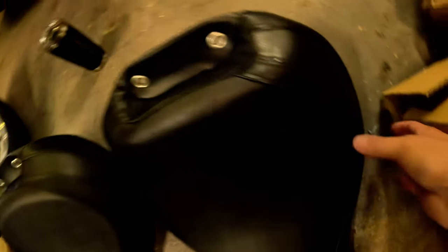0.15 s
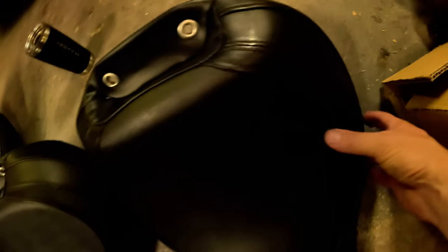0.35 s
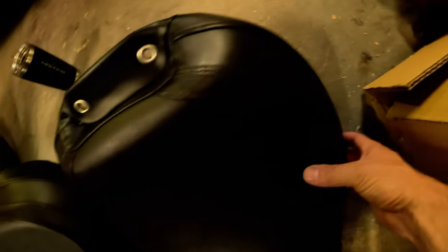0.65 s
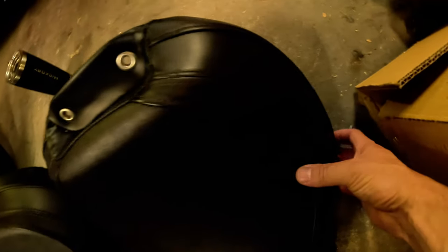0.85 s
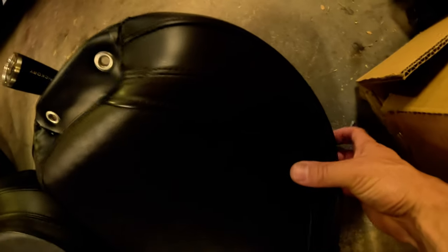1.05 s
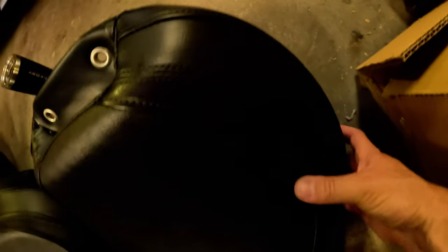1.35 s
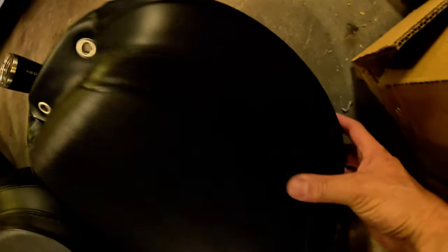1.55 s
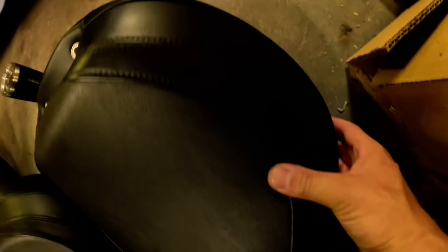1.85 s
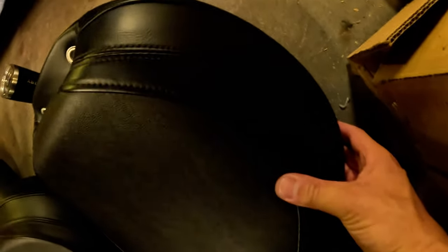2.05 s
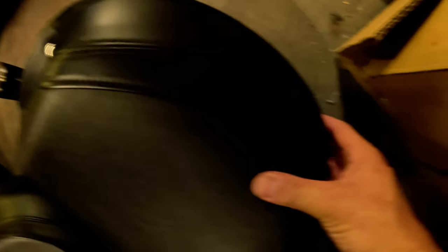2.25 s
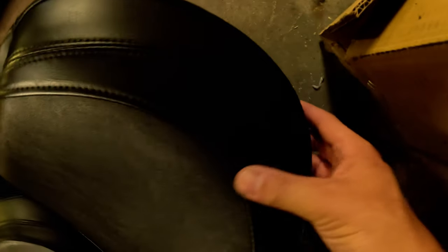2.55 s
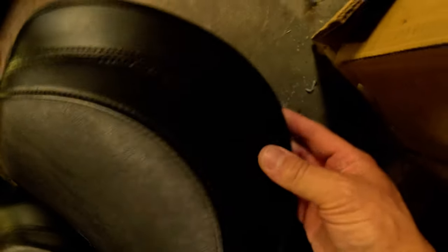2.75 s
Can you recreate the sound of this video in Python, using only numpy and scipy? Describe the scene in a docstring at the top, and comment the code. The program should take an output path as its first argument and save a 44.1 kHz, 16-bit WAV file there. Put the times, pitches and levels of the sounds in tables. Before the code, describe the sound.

A padded vinyl seat is handled on a concrete garage floor: faint finger pats and rubs, a cluster of dull knocks, then short gritty drags with a low judder, close microphone, quiet small room.

```python
"""Padded seat on a garage floor

A hand grips a padded vinyl motorcycle seat and shifts it over a concrete garage floor.
The seat gives dull knocks, drags in gritty stick-slip scrapes, judders and squeaks once.
Fingers pat and rub the cover, skin brushes it and the vinyl snaps, over low rumble and room tone.
Knocks are decaying tones and noise, friction is trains of small slips, the rest is filtered noise."""
import sys
import numpy as np
from scipy import signal
from scipy.fft import rfft, irfft
from scipy.io import wavfile
from scipy.ndimage import uniform_filter1d

SR = 44100
rng = np.random.default_rng(int(sys.argv[2]) if len(sys.argv) > 2 else 0)


def log_audio(samples):
    """Write samples as a 16-bit WAV file to the path given in sys.argv[1]."""
    # one column per channel
    frames = np.atleast_2d(samples).T
    # limit to full scale, then quantise
    limited = np.clip(frames, -1, 1)
    pcm = np.round(limited * 32767).astype(np.int16)
    wavfile.write(sys.argv[1], SR, pcm)


N = 127890  # length in samples
T = np.arange(N) / SR  # time in seconds
CONTACT_RISE_S = 0.001  # soft start of the knocks' contact sound and of the pats


def undb(db):
    """Turn decibels into a gain."""
    return 10 ** (np.asarray(db) / 20)


def unit(x):
    """Scale a sound to an average (rms) strength of 1."""
    return x / np.sqrt(np.mean(x ** 2))


def colour(x, points):
    """Filter x through (pitch_hz, level_db) points without pre-echo; the result has rms 1."""
    hz, db = np.array(points, float).T
    size = 4096
    freqs = np.maximum(np.fft.rfftfreq(size, 1 / SR), 1)
    log_gain = np.log(undb(np.interp(np.log(freqs), np.log(hz), db)))
    # Folding the cepstrum gives the filter that responds as early as it can (minimum phase).
    cepstrum = irfft(log_gain)
    cepstrum[1:size // 2] *= 2
    cepstrum[size // 2 + 1:] = 0
    response = irfft(np.exp(rfft(cepstrum)))
    return unit(signal.fftconvolve(x, response)[:N])


def curve(rows, column=1):
    """Draw a gain over time from a dB column, practically silent before and after the rows."""
    rows = np.array(rows, float)
    return undb(np.interp(T, rows[:, 0], rows[:, column], left=-200, right=-200))


def swell(centre, spread):
    """A smooth bell-shaped rise and fall around a moment."""
    return np.exp(-((T - centre) / spread) ** 2 / 2)


def add(out, start, x):
    """Mix x into out from a start time."""
    i = int(start * SR)
    out[i:i + len(x)] += x[:N - i]


def slips(hz, jitter, spread_db):
    """Stick-slip friction: a train of sudden releases with uneven gaps and sizes."""
    chance = rng.standard_normal((4000, 2))
    gaps_s = np.exp(jitter * chance[:, 0]) / hz
    at = (np.cumsum(gaps_s) * SR).astype(int)
    inside = at < N
    sizes = undb(spread_db * chance[inside, 1])
    return np.bincount(at[inside], sizes, N)


def grains(spread_db):
    """Fine rough texture: dense micro-clicks of very unequal size."""
    sizes = undb(spread_db * np.minimum(rng.exponential(size=N), 5))
    return unit(rng.standard_normal(N) * sizes)


def steady(x, seconds=0.045):
    """Even out slow changes of strength, so that a level curve can set them."""
    power = np.abs(uniform_filter1d(x ** 2, int(seconds * SR)))
    return x / np.sqrt(power + 0.0011)


CONTACT_RING_S, CONTACT_RING_DB = 0.0026, -3.5  # decay time, level against the plain sound


def patch(x):
    """A patch of contact rings for a few milliseconds with its own chance resonances."""
    length = SR // 25
    ring = rng.standard_normal(length) * np.exp(-T[:length] / CONTACT_RING_S)
    ringing = signal.fftconvolve(x, ring / np.linalg.norm(ring))[:N]
    return unit(x + undb(CONTACT_RING_DB) * ringing)


# Knocks of the seat: start_s, pitch_hz, thump_db, shell_db, tick_db
# (shell, tick and crackle are halved when mixed)
SEAT_KNOCKS = [(0.832, 156, -29.5, -65, -56), (0.8575, 237, -29.5, -35, -45.5),
               (0.8625, 172, -21, -60, -50), (0.967, 217, -26, -37, -45.5),
               (0.9961, 190, -28.5, -34, -39.5), (1.181, 238, -31.5, -52, -42),
               (1.213, 188, -26.5, -41, -44), (1.249, 152, -28, -42, -53), (1.291, 143, -38, -54, -50.5),
               (1.499, 213, -39, -47, -46), (1.974, 345, -29, -32, -38.5), (1.993, 334, -29.5, -36, -41),
               (2.017, 327, -30.5, -42, -39), (2.03, 268, -32, -35, -46), (2.281, 144, -35.5, -66, -98),
               (2.474, 300, -28.5, -40, -39), (2.507, 286, -27.5, -38.5, -35)]
# Ringing tones of the seat shell: pitch_hz, level_db, t60_s (time to fall by 60 dB);
# each knock shifts pitch and level a little by chance
SHELL_TONES = [(312, -18.5, 0.05), (474.6, 8, 0.046), (545, -5.5, 0.034), (705, -6, 0.021),
               (892, -11, 0.081), (1048, -7.5, 0.047)]
# Tone colour of the contact tick: pitch_hz, level_db
TICK_TONE = [(500, 18), (1000, 11.5), (2300, 9), (4000, 1), (9000, -14), (15000, -25)]
THUMP_CYCLES, THUMP_RISE = 0.31, 2.7  # fade time in cycles, steepness of the rise
TICK_S = 0.006  # decay time
CRACKLE_DB, CRACKLE_S = -22.5, 0.0029  # level against the tick, decay time


def knocks():
    """Each knock is a damped padding thump, a short shell ring, a contact tick and a vinyl crackle."""
    out, t = np.zeros(N), T[:SR // 5]
    ticks = colour(rng.standard_normal(N), TICK_TONE)
    crackles = np.diff(grains(spread_db=2), prepend=0) / 2  # differences favour the treble
    for start, hz, thump_db, shell_db, tick_db in SEAT_KNOCKS:
        i = int(start * SR)
        age = t * hz / THUMP_CYCLES
        thump_shape = (age / THUMP_RISE) ** THUMP_RISE * np.exp(THUMP_RISE - age)
        thump = thump_shape * np.sin(2 * np.pi * hz * t)

        shell = np.zeros(len(t))
        for tone_hz, db, t60 in SHELL_TONES:
            level_chance, pitch_chance = rng.standard_normal(2)
            fade = undb(db + 2 * level_chance - 60 * t / t60)
            shell += fade * np.sin(2 * np.pi * tone_hz * (1 + 0.036 * pitch_chance) * t)

        # Each knock takes a different stretch of the noise.
        tick = np.roll(ticks, -i)[:len(t)] * np.exp(-t / TICK_S)
        crackle = undb(CRACKLE_DB) * np.roll(crackles, -i)[:len(t)] * np.exp(-t / CRACKLE_S)
        soft_start = 1 - np.exp(-t / CONTACT_RISE_S)
        contact = soft_start * (undb(shell_db) * shell + undb(tick_db) * tick) / 2
        add(out, start, undb(thump_db) * thump + contact + undb(tick_db) * crackle)
    return out


# Drags over the concrete, one list per drag: time_s, body_db, grit_db
# (BODY_DB and GRIT_DB are added to these)
FLOOR_DRAGS = [
    [(1.07, -60, -74), (1.10, -44.5, -58.5), (1.15, -39.5, -56.5), (1.2, -38.5, -51), (1.25, -41.5, -57),
     (1.285, -68, -77)],
    [(1.375, -60, -91), (1.418, -43, -64.5), (1.44, -52.5, -76), (1.465, -41.5, -66.5), (1.49, -64, -92)],
    [(1.585, -55, -69), (1.602, -47, -59), (1.62, -36.5, -49.5), (1.685, -39, -54.5), (1.702, -44, -62.5),
     (1.735, -46, -58.5), (1.765, -41, -52), (1.803, -41.5, -58), (1.83, -38, -53), (1.862, -33.5, -52.5),
     (1.885, -46, -62), (1.92, -88, -77)],
    [(2.572, -39, -58), (2.604, -50, -71), (2.614, -34.5, -57.5), (2.668, -40, -54), (2.688, -53, -67.5),
     (2.73, -61, -60.5)],
]
# Tone colour of the shaken seat body: pitch_hz, level_db
BODY_TONE = [(70, -37), (140, -1), (290, 4.5), (400, -9), (480, -3.5), (640, -11.5), (980, -10),
             (1170, -27.5), (1700, -35.5), (9000, -55.5)]
# Tone colour of the grit: pitch_hz, level_db
GRIT_TONE = [(700, -8.5), (1300, 4.5), (3300, -0.5), (5000, -6), (6800, -19), (9000, -19), (15000, -25)]
SLIP_HZ, SLIP_JITTER, SLIP_SPREAD_DB = 401.8, 0.6, 2  # typical rate, unevenness of gaps and sizes
BODY_DB, GRIT_DB = -1.5, -1
SLIP_S = 0.002  # decay time of one puff of grit
GRAIN_SPREAD_DB = 3.5
GRIT_GATE = 0.43  # share of the grit that follows the slips; the rest is constant


def drags():
    """Slips shake the seat's body, and each one sheds a puff of grit noise."""
    pulses = slips(SLIP_HZ, SLIP_JITTER, SLIP_SPREAD_DB)
    body = steady(colour(pulses - pulses.mean(), BODY_TONE))
    puffs = unit(signal.lfilter([1], [1, -np.exp(-1 / (SLIP_S * SR))], pulses))
    grit_strength = 1 - GRIT_GATE + GRIT_GATE * puffs
    grit = steady(colour(grains(GRAIN_SPREAD_DB) * grit_strength, GRIT_TONE))
    out = np.zeros(N)
    for rows in FLOOR_DRAGS:
        out += undb(BODY_DB) * body * curve(rows, column=1)
        out += undb(GRIT_DB) * patch(grit) * curve(rows, column=2)
    return out


def regular_slips(rows, rough, fall_db):
    """Regular stick-slip makes a tone: four harmonics on an unsteady pitch."""
    times, hz, _ = np.array(rows, float).T
    wobble = unit(uniform_filter1d(rng.standard_normal(N), size=150))
    pitch_hz = np.interp(T, times, hz) * (1 + rough * wobble)
    phase = 2 * np.pi * np.cumsum(pitch_hz) / SR
    tone = sum(undb(fall_db * k) * np.sin((k + 1) * phase) for k in range(4))
    return unit(tone) * curve(rows, column=2)


# Judders, one list per judder: time_s, pitch_hz, level_db
SEAT_JUDDERS = [
    [(1.596, 275, -52), (1.601, 274, -38.5), (1.638, 236, -35.5), (1.652, 264, -37), (1.69, 298, -51)],
    [(2.61, 310, -46.5), (2.635, 346.4, -39.5), (2.655, 419, -49), (2.668, 251, -38), (2.683, 288, -39)],
]


def judders():
    """The slips turn regular at a low pitch, so the seat judders."""
    # rough is the pitch wobble as a fraction; fall_db is the step from harmonic to harmonic
    return sum(regular_slips(rows, rough=0.0621, fall_db=-13) for rows in SEAT_JUDDERS)


# The squeak: time_s, pitch_hz, level_db
SEAT_SQUEAK = [(2.645, 923, -54), (2.668, 828, -44.5), (2.682, 882, -45), (2.698, 829, -52.5),
               (2.725, 1054, -59)]


def squeak():
    """Faster regular slips give one purer, higher tone."""
    return regular_slips(SEAT_SQUEAK, rough=0.0484, fall_db=-18)


# Sharp snaps of the vinyl: start_s, level_db, ring_hz
VINYL_SNAPS = [(2.5699, -22, 690)]
SNAP_S = 0.00082  # decay time


def snaps():
    """The taut cover lets go of a finger: about one cycle of ring and a bright crack."""
    out, t = np.zeros(N), T[:SR // 20]
    for start, db, hz in VINYL_SNAPS:
        bright_noise = colour(rng.standard_normal(N), [(3000, -7), (15000, -15)])
        crack = undb(-17.5) * bright_noise[-len(t):]
        ring = 1.15 * np.sin(2 * np.pi * hz * t)
        add(out, start, undb(db) * np.exp(-t / SNAP_S) * (ring + crack))
    return out


# Light pats of the fingers on the padding: start_s, level_db (of each of the two tones, before fading)
FINGER_PATS = [(0.466, -46), (0.486, -41), (0.506, -41.5), (0.529, -42), (0.549, -48.5), (0.822, -42),
               (2.542, -39.5)]
PAT_SHELL_HZ, PAT_PADDING_HZ = 461, 169  # typical pitches, shifted a little for each pat
PAT_S = 0.0054  # decay time


def pats():
    """A fingertip lands softly: shell and padding ring briefly, at a pitch that varies with the spot."""
    out, t = np.zeros(N), T[:SR // 10]
    fade = (1 - np.exp(-t / CONTACT_RISE_S)) * np.exp(-t / PAT_S)
    for start, db in FINGER_PATS:
        turn = 2 * np.pi * t * (1 + 0.07 * rng.standard_normal())
        tones = np.sin(PAT_SHELL_HZ * turn) + np.sin(PAT_PADDING_HZ * turn)
        add(out, start, undb(db) * fade * tones)
    return out


# Soft rubs of the fingers on the padded cover: start_s, length_s, level_db
FINGER_RUBS = [(0.3, 0.14, -65), (0.42, 0.17, -53), (0.596, 0.16, -53.5), (0.807, 0.11, -47),
               (0.95, 0.133, -50.5), (1.49, 0.075, -50.5), (1.934, 0.13, -48.5), (2.69, 0.29, -61)]
# Tone colour of the rubs: pitch_hz, level_db
RUB_TONE = [(70, 0), (140, 9.5), (280, 3.5), (400, -5), (510, -1), (680, -15), (1300, -21), (2400, -33),
            (12000, -42.5)]
RUB_SLIP_HZ, RUB_EDGE_S = 107.8, 0.027  # typical slip rate, time to build or ease


def rubs():
    """Fingers creep over the padding in slow, muffled slips; the pressure builds and eases."""
    pulses = slips(RUB_SLIP_HZ, jitter=0.6, spread_db=6.5)
    rough_slips = unit(pulses - pulses.mean()) + grains(spread_db=0.5)
    pressure = np.zeros(N)
    for start, length, db in FINGER_RUBS:
        nearest_edge_s = np.minimum(T - start, start + length - T)
        pressure += undb(db) * np.clip(nearest_edge_s / RUB_EDGE_S, 0, 1)
    return steady(colour(rough_slips, RUB_TONE)) * pressure


# Skin brushing the vinyl: centre_s, spread_s, level_db, band_hz (middle of the band let through)
SKIN_BRUSHES = [(0.034, 0.14, -79, 4670), (0.347, 0.046, -69, 4170), (0.446, 0.0069, -54, 4700),
                (0.465, 0.032, -67.5, 4000), (0.627, 0.046, -64, 3780), (0.693, 0.01, -61, 2320),
                (1.004, 0.019, -64.5, 1880), (1.355, 0.0096, -71, 2520), (1.506, 0.024, -72, 2200),
                (2.013, 0.052, -66, 2930), (2.464, 0.083, -73, 3100), (2.634, 0.11, -65.5, 4400),
                (2.752, 0.051, -61.5, 4800), (2.83, 0.09, -66.5, 2640)]
# Tone colour of the vinyl's grain: pitch_hz, level_db
BRUSH_TONE = [(400, -12.5), (1200, 11), (5200, -5), (8800, -5), (15000, -11)]
BRUSH_OCTAVES = 1.1  # width of each stroke's band


def brushes():
    """Skin slides over the vinyl's fine grain; each stroke has its own brightness."""
    out, freqs = np.zeros(N), np.maximum(np.fft.rfftfreq(N, 1 / SR), 1)
    grain = rfft(colour(grains(spread_db=2), BRUSH_TONE))
    for centre, spread, db, hz in SKIN_BRUSHES:
        octaves_away = np.log2(freqs / hz)
        band = 1 / np.sqrt(1 + (octaves_away / BRUSH_OCTAVES * 2) ** 2)
        stroke = unit(irfft(grain * band, N))
        out += undb(db) * patch(np.roll(stroke, rng.integers(N))) * swell(centre, spread)
    return out


ROOM_T60_S, ROOM_DELAY_S = 0.25, 0.0058  # time to fall by 60 dB, wait before the first reflection
ROOM_DB, ROOM_TOP_HZ = -17.5, 5000  # level of the reflections, where their treble starts to fall


def garage(x):
    """Add short, dull reflections: a fading tail of softened noise."""
    t = T[:SR // 2]
    dull = signal.butter(1, ROOM_TOP_HZ, fs=SR, output="sos")
    tail = signal.sosfilt(dull, rng.standard_normal(len(t)))
    tail = tail * np.exp(-np.log(1000) * t / ROOM_T60_S) * (t > ROOM_DELAY_S)
    return x + undb(ROOM_DB) * signal.fftconvolve(x, tail / np.linalg.norm(tail))[:N]


# Swells of handling rumble as the seat sways: centre_s, spread_s, level_db (added to the constant rumble)
SEAT_SWAYS = [(0.515, 0.09, -51), (0.876, 0.0099, -34), (1.073, 0.14, -49), (1.49, 0.09, -51.5),
              (1.855, 0.04, -44.5), (2.418, 0.025, -42), (2.502, 0.023, -41), (2.64, 0.26, -51)]
# Tone colour of the rumble: pitch_hz, level_db
RUMBLE_TONE = [(25, 5), (45, 0), (85, -4.5), (150, -11), (380, -24), (1200, -74)]
RUMBLE_DB = -61.5  # constant part


def rumble():
    """Low handling noise that swells as the seat sways."""
    strength = undb(RUMBLE_DB)
    for centre, spread, db in SEAT_SWAYS:
        strength = strength + undb(db) * swell(centre, spread)
    return steady(colour(rng.standard_normal(N), RUMBLE_TONE), seconds=0.059) * strength


# Tone colour of the quiet room: pitch_hz, level_db
ROOM_TONE = [(25, -4.5), (80, -6), (170, -16.5), (540, -34), (2200, -43.5), (8500, -57)]
ROOM_TONE_DB = -59


def room_tone():
    """The quiet room is a constant soft noise, strongest in the bass."""
    return undb(ROOM_TONE_DB) * colour(rng.standard_normal(N), ROOM_TONE)


def scene():
    """The seat sounds reflect in the garage; rumble and room tone are added without reflections."""
    impacts = knocks() + pats() + snaps()
    friction = drags() + judders() + squeak() + rubs() + brushes()
    return (garage(impacts + friction) + rumble() + room_tone())[None]


# Treble response of the microphone: pitch_hz, level_db
MICROPHONE_TONE = [(9000, 0.5), (11000, -10), (12500, -6), (15500, -23)]
TOP_HZ = 15570  # the recorder cuts steeply above this


def record(dry):
    """The microphone dulls the treble and the recorder cuts its top."""
    hz, db = np.array(MICROPHONE_TONE, float).T
    gain = undb(np.interp(np.fft.rfftfreq(2 * N, 1 / SR), hz, db))
    dulled = irfft(rfft(dry, 2 * N) * gain)[:, :N]
    return signal.sosfilt(signal.ellip(8, 0.2, 70, TOP_HZ, fs=SR, output="sos"), dulled)


dry = scene()
out = record(dry)
log_audio(out)
```